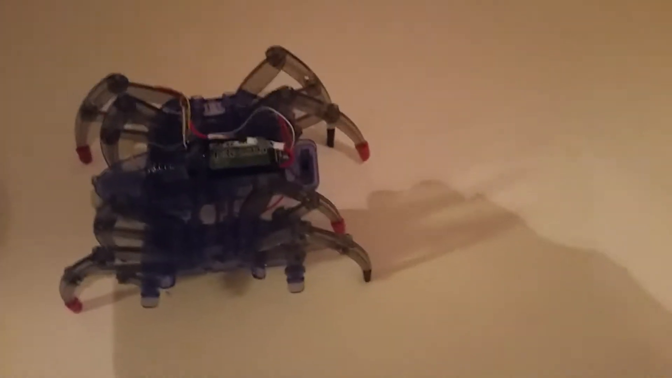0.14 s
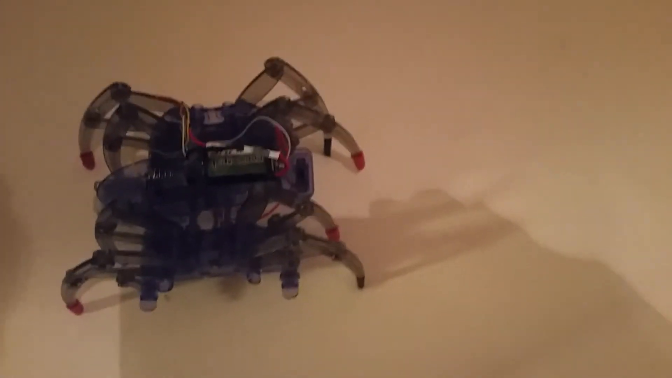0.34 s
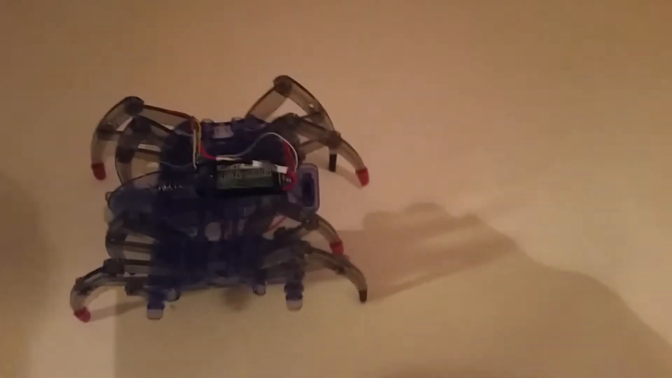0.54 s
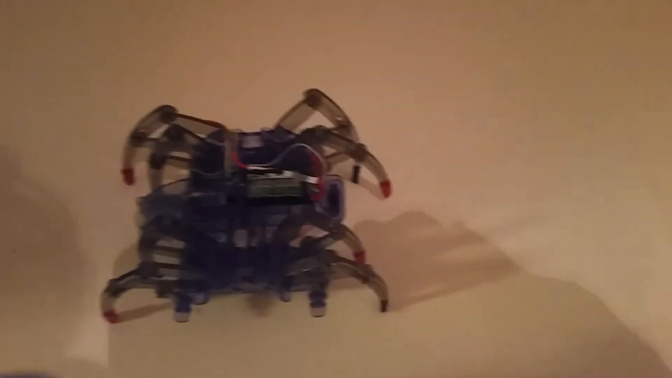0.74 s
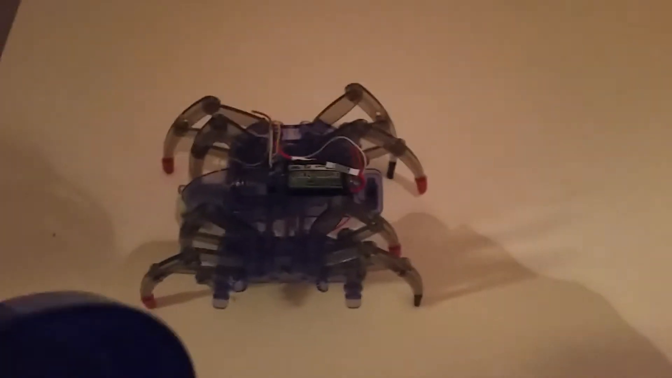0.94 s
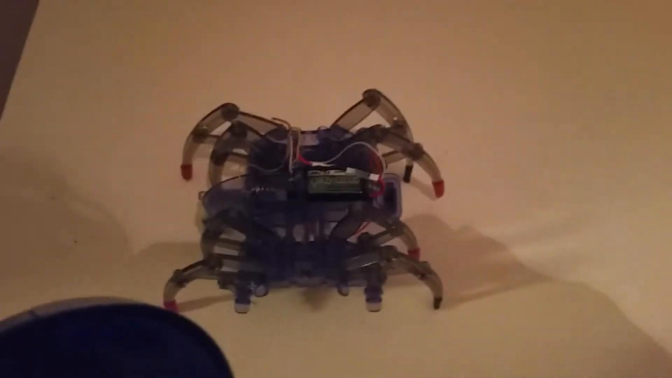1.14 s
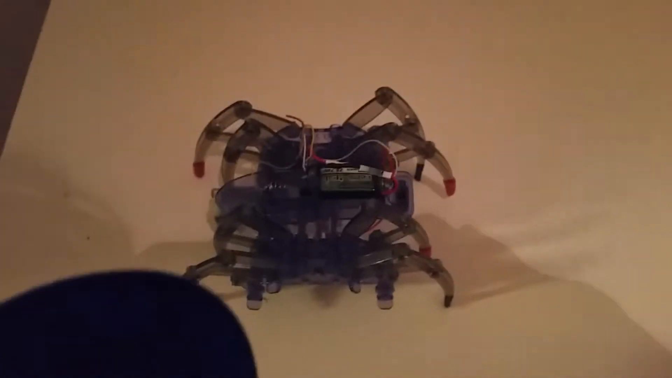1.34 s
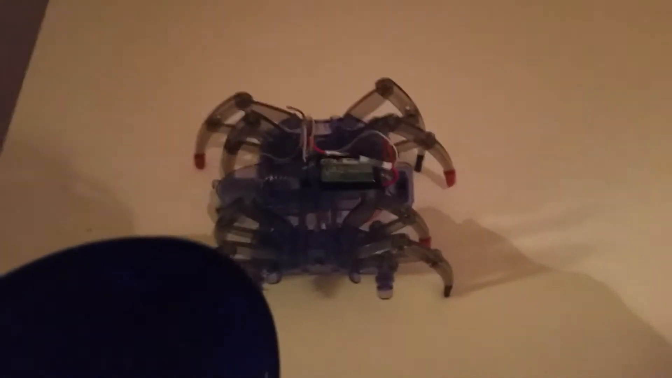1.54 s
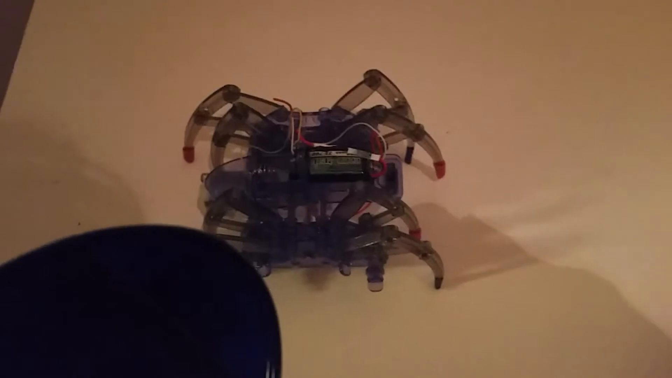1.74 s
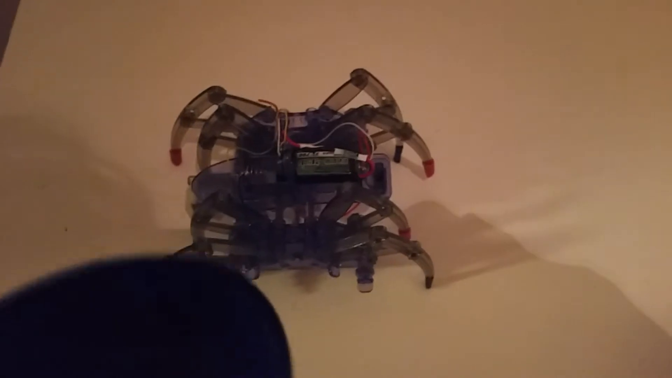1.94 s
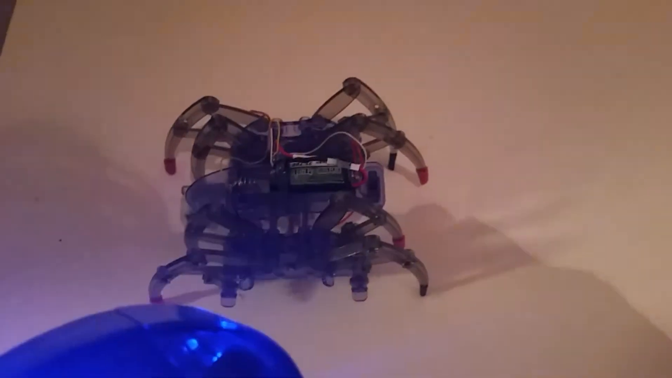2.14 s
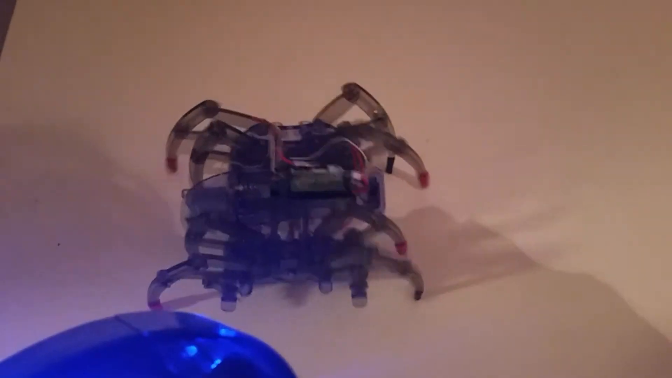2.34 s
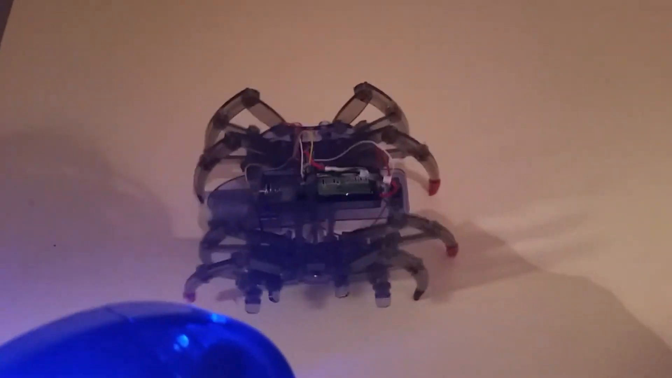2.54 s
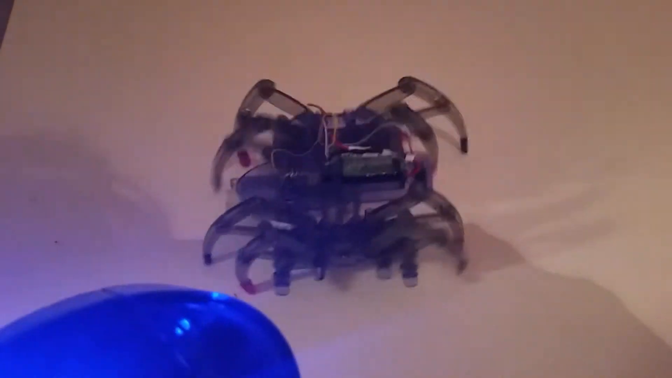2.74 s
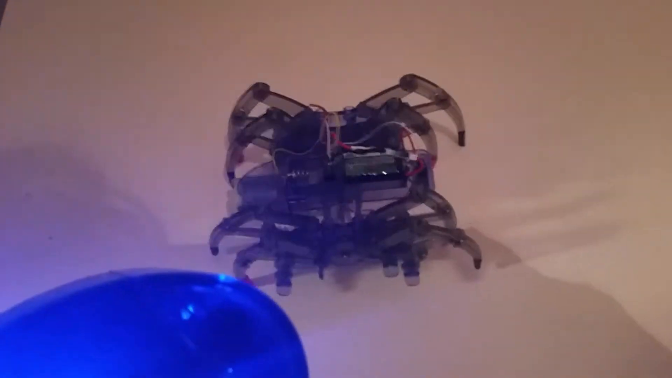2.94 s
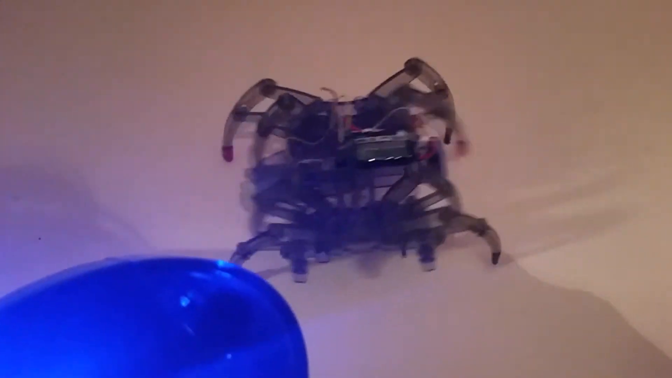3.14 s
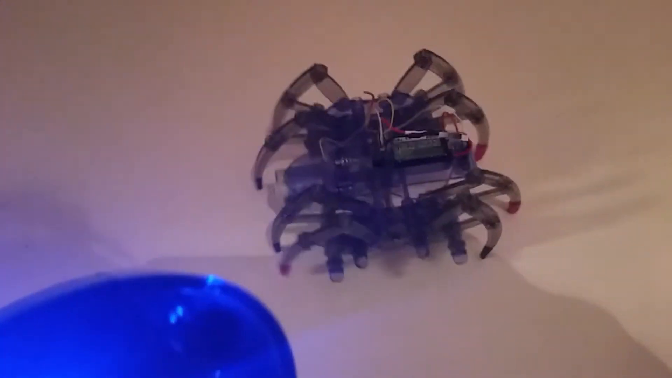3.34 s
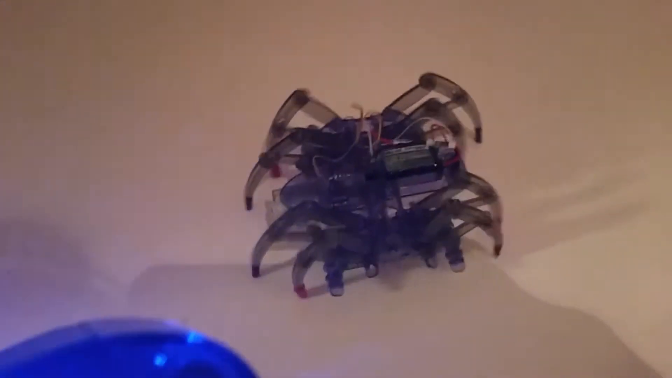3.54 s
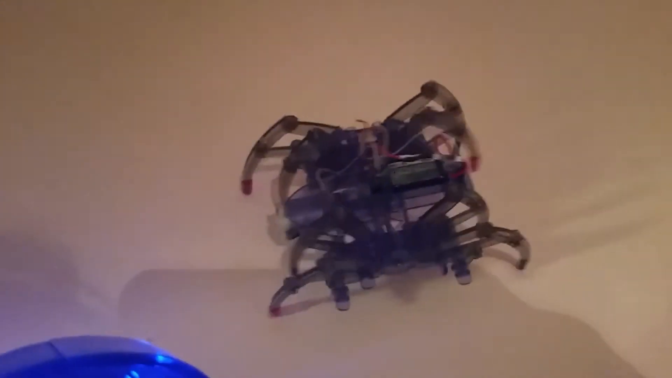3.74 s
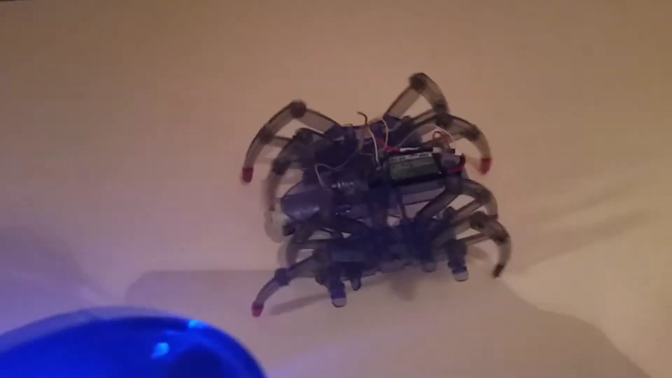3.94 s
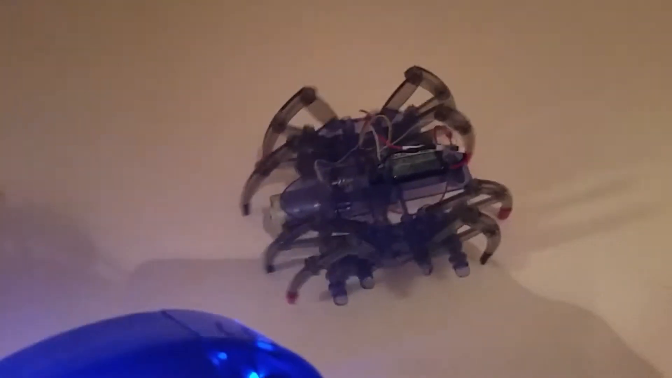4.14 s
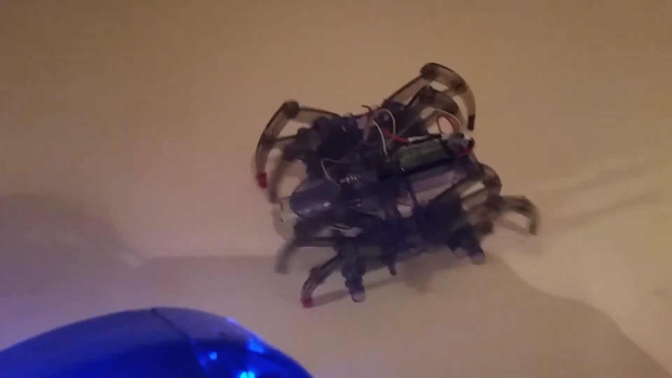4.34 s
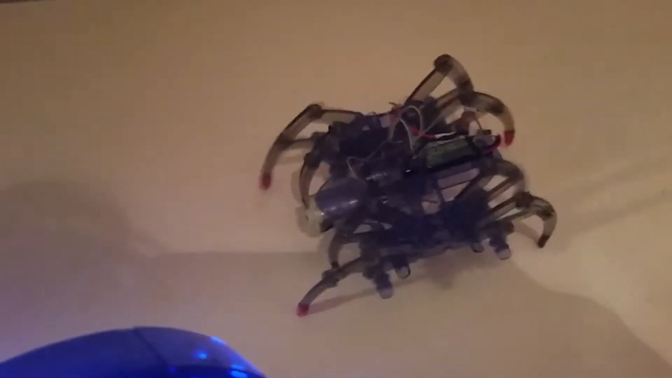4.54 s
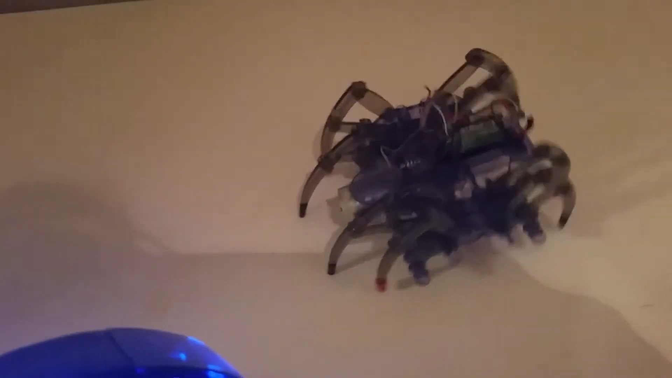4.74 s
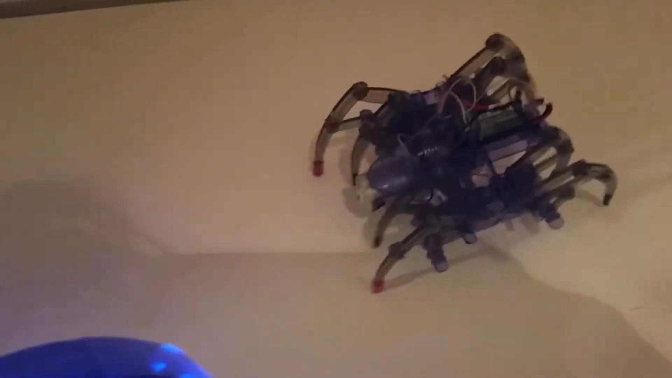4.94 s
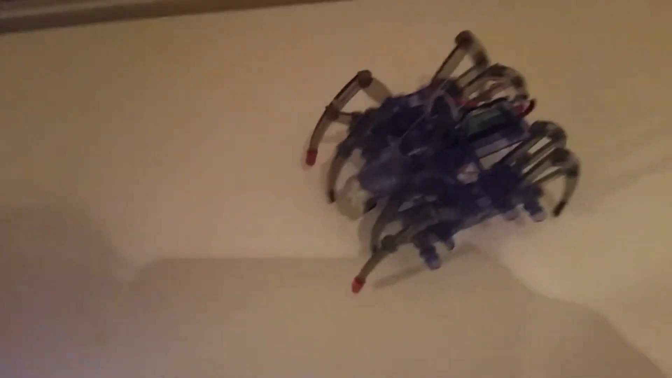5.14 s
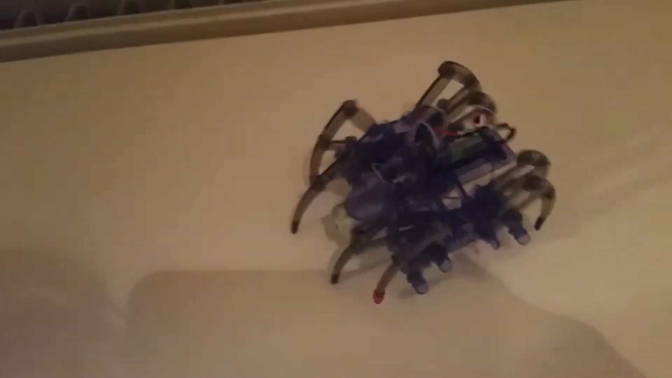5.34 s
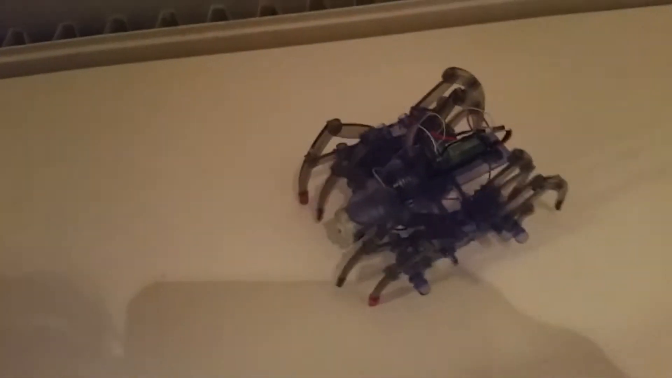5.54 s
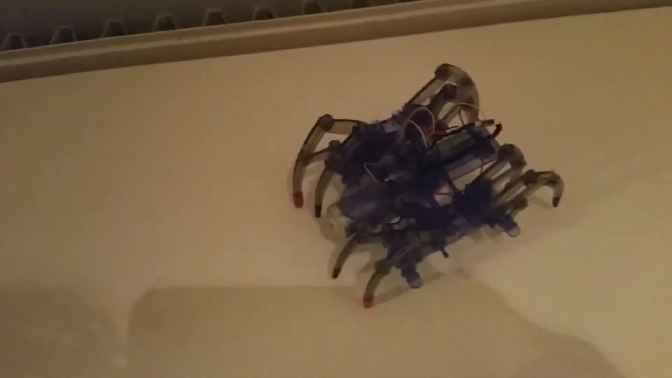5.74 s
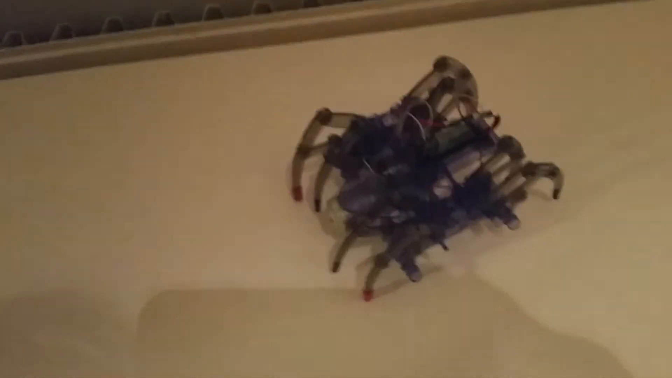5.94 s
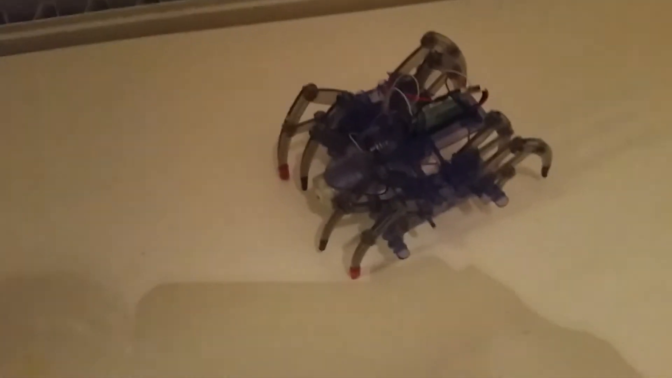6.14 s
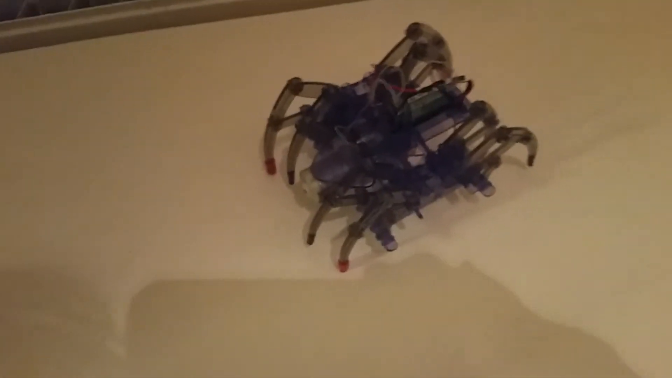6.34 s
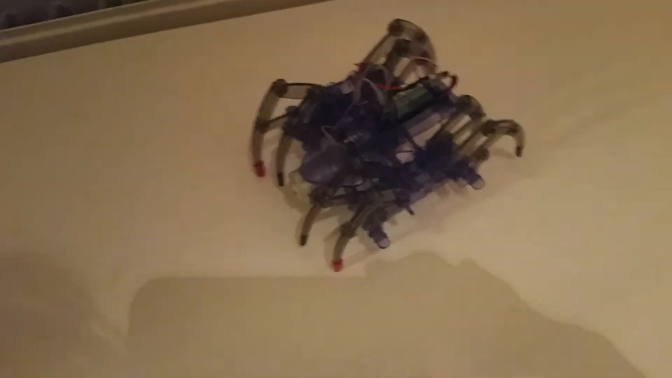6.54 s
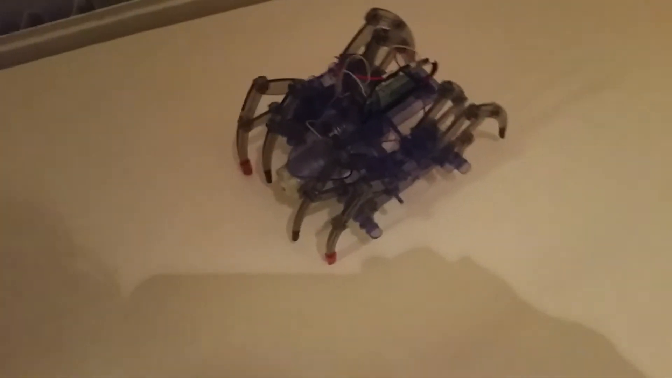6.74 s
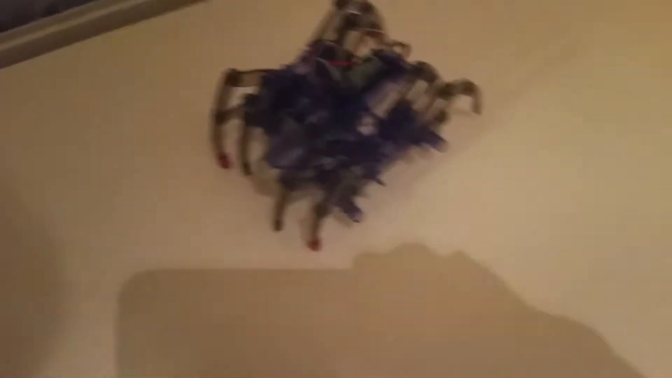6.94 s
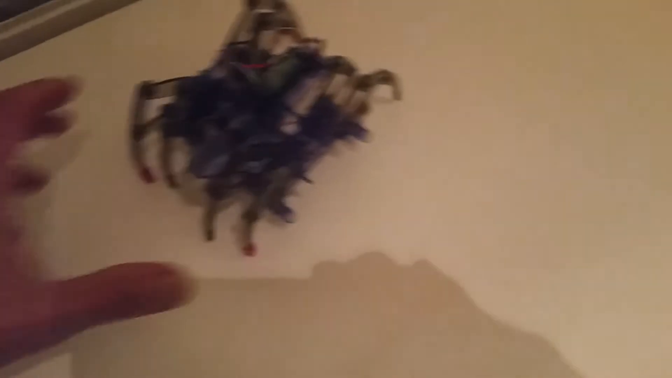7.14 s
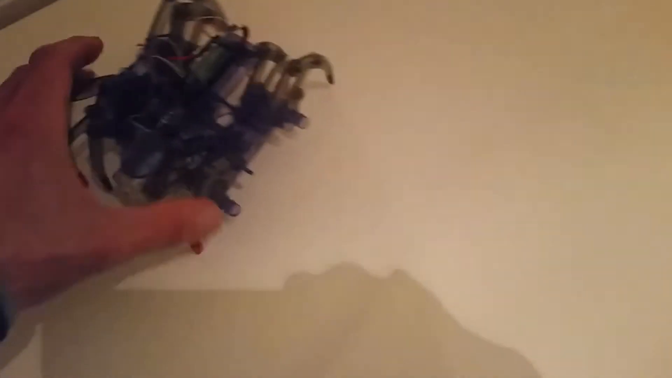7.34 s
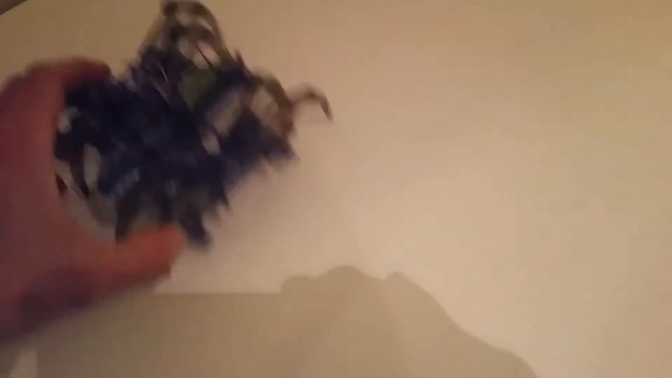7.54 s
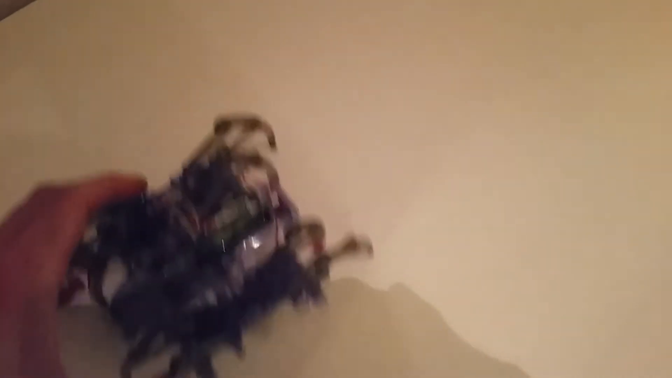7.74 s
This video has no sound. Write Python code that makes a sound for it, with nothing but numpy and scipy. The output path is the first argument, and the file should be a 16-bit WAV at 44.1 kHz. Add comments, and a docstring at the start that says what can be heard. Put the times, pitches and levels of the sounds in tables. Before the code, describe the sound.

A small geared motor whirs and rattles in quick surges as a plastic toy spider walks, with light clicks before and after.

```python
"""A walking toy on a hard floor

A small geared motor walks a plastic toy along, close to a hand-held camera in a quiet room.
The motor speeds up and coasts down in turns; each gear tooth knocks a puff of noise into the housing.
Plastic parts click, skin rustles on plastic and fingers bump the camera.
A faint hum, a rumble from the grip and microphone hiss lie under it all."""
import sys
import numpy as np
from scipy import signal
from scipy.fft import rfft, irfft, next_fast_len
from scipy.io import wavfile
from scipy.ndimage import uniform_filter1d

SR = 44100
rng = np.random.default_rng(int(sys.argv[2]) if len(sys.argv) > 2 else 0)


def unload_audio(sound):
    """Save the sound as a 16-bit wav file, at the path given as the first command line argument."""
    columns = np.transpose(np.atleast_2d(sound))
    # keep every value between -1 and 1, then stretch to whole-number steps
    steps = np.round(np.clip(columns, -1, 1) * 32767)
    wavfile.write(sys.argv[1], SR, steps.astype(np.int16))


N = 343803

# Bursts of power. Each row: on and off in seconds, speed the motor heads for in teeth per second.
POWER_BURSTS = [(2.29, 2.42, 1210), (2.53, 2.74, 1250), (2.965, 3.27, 1220), (3.43, 3.55, 1250),
                (3.58, 3.745, 1070), (3.89, 4.02, 1075), (4.08, 4.385, 1000), (4.47, 4.7, 1150),
                (4.75, 4.85, 1110), (4.9, 5.03, 1200), (5.18, 5.3, 1190), (5.37, 5.49, 1210)]
# When the gears are heard. Each row: start and stop in seconds.
WALK_TIMES = [(2.335, 2.85), (3.0, 5.6)]
# A leg takes the load and the gears surge.
# Each row: start and hold in seconds, then the levels of whir, rattle and ring in dB.
STRIDE_SURGES = [(2.401, 0.065, -42, -52, -53), (2.578, 0.093, -38, -51.5, -48),
                 (2.763, 0.042, -36.5, -49, -45.5), (3.024, 0.1, -39.5, -55, -49.5),
                 (3.223, 0.044, -40.5, -64.5, -47.5), (3.344, 0.068, -42.5, -58.5, -50.5),
                 (3.46, 0.072, -40, -55.5, -48.5), (3.582, 0.13, -34.5, -49, -43.5),
                 (3.874, 0.016, -39, -50.5, -47.5), (3.944, 0.094, -36, -51.5, -45.5),
                 (4.145, 0.044, -36.5, -51.5, -44.5), (4.283, 0.097, -37.5, -54, -44),
                 (4.437, .04, -40.5, -77, -48.5), (4.561, 0.069, -38.5, -58.5, -44),
                 (4.667, 0.02, -37.5, -59, -44.5), (4.808, 0.048, -36, -55, -45),
                 (4.899, 0.036, -31.5, -52, -43), (5.067, 0.06, -35.5, -54.5, -47.5),
                 (5.2, 0.13, -36.5, -54.5, -47.5), (5.354, 0.037, -39.5, -61.5, -51),
                 (5.459, 0.081, -33.5, -51, -42.5)]
# The levels between strides: whir, rattle and ring in dB.
BETWEEN_STRIDES_DB = [-48., -56.5, -54.5]
# The tone of gear whir, housing rattle and frame ring. Each row: frequency in Hz, relative level in dB.
WHIR_TONE = [(5060, -50), (8600, -59.5), (9180, -20), (10100, -9), (11100, -7), (12000, -8), (12900, -10.5),
             (13600, -7), (14300, -15), (15000, -16), (15700, -16.5)]
RATTLE_TONE = [(710, -18), (1200, -18.5), (1430, -6.5), (1800, 6.5), (1990, 3.5), (2140, 3), (2450, -5),
               (3200, 3.5), (4160, -29.5), (7040, -120)]
RING_TONE = [(1650, -13.5), (2800, -7), (3350, -8.5), (3630, -3), (3900, -6), (4610, -1), (5440, -14.5),
             (5970, -14.5), (6650, -8.5), (7370, -5), (8320, -12.5), (9000, -13.5), (11700, -29),
             (19800, -120)]
# A peak in the whir slides as the toy turns. Each row: time in seconds, frequency in Hz.
WHIR_PEAK = [(2.3, 12500), (3.05, 12800), (3.6, 12800), (4.1, 12100), (4.55, 13000), (5.3, 12850),
             (5.5, 13300)]
# The toy walks on the right. Each row: time in seconds, pan in dB (pan is left level minus right).
TOY_PAN = [(2.3, -9.5), (3.2, -10.5), (4.2, -9.5), (5.2, -11), (5.7, -8.5)]
# Parts of the motor's tone lean to one side. Each row: frequency in Hz, extra pan in dB.
MOTOR_TONE_PAN = [(1200, 13), (1800, 1), (2740, 11.5), (4200, 2), (5500, -2.5), (6400, -7), (8500, 3.5),
                  (9800, 12.5), (13000, 0.5), (15500, 9)]
# Squeals of the housing. Each row: start and length in seconds, pitch in Hz, level in dB.
PANEL_SQUEALS = [(2.61, 0.092, 4740, -40.5), (2.74, 0.043, 1695, -47.5), (3.2, 0.13, 2050, -52),
                 (3.56, 0.096, 4170, -43), (3.95, 0.093, 4300, -49), (4.19, 0.19, 4460, -45),
                 (4.24, 0.18, 1804, -47.5), (4.54, 0.075, 4500, -47.5), (4.55, 0.076, 1890, -49.5),
                 (4.77, 0.11, 1829, -48), (4.81, 0.15, 4020, -47), (4.89, 0.057, 2140, -50),
                 (5.04, 0.078, 4120, -51.5), (5.06, 0.12, 1800, -58), (5.24, 0.14, 4350, -52),
                 (5.45, 0.11, 2525, -46.5), (5.46, 0.081, 4300, -41.5), (5.46, 0.069, 3420, -47.5),
                 (5.5, 0.035, 2090, -47.5)]
# Plastic clicks, and at 2.985 s a sharp knock of the gear teeth that rings the same notes. Each row: start in
# seconds, peak of the high notes in dB, how far the middle and the low notes lie above that in dB, pan in dB.
PLASTIC_CLICKS = [(0.2267, -41, -0.5, -5, -13), (0.244, -44, -7, -12, -9), (0.2905, -47, -4, -14, -10),
                  (0.4492, -20.5, -9, -20.5, -3.5), (0.4613, -35, -10, -23, -8),
                  (2.1447, -39.5, 15, 7.5, -8), (2.7623, -25, -18, -25, 6), (2.985, -32, -10, -17, -9),
                  (3.213, -35, -8, -1, -8), (3.5375, -25, -15, -17, -8), (4.54, -31, -7.5, -6, -7),
                  (4.6645, -23, -10, -28, -7.5), (5.053, -31.5, -9.5, -3.5, -6.5),
                  (5.431, -6.5, -20.5, -22, -15), (5.6899, -46, -4, -2, 6), (6.239, -33.5, 1, -13, -23),
                  (6.245, -41, -4.5, 2.5, -6), (6.2522, -44, -3, 3, 1), (6.2582, -51, -3, -4, -5),
                  (6.2653, -37.5, -1.5, -2.5, -14), (6.272, -47, -3, -3.5, -9), (6.278, -47, -3, -1, -6),
                  (6.287, -45, -1, -3, -6), (6.3822, -36, -4, -19, -3), (6.3873, -27.5, -17, -18, -13),
                  (6.3957, -33, -7, -14, 0), (6.649, -49, -4, -12, 0), (7.6903, -49, -1, -10, -7)]
# The notes the plastic rings at, in a low, a middle and a high group.
# Each row: pitch in Hz, relative level in dB, seconds to fade by 60 dB.
PLASTIC_NOTES = [
    [(1100, 0, .016), (1600, -6, .01), (2300, -4, .012)],
    [(3300, -7, .01), (3900, 0, .012), (4500, -7, .008)],
    [(5800, -17, .005), (6900, -14, .006), (7900, -18, .005), (10400, -7, .007), (11800, 0, .008),
     (12900, -4, .007), (14000, -3, .007), (15300, -6, .006)],
]
# Fingers bump the camera. Each row: start in seconds, level in dB, pitch the knock sags to in Hz,
# pan of the knock in dB, level of the thud compared with the knock in dB.
FINGER_BUMPS = [(0.359, -35.5, 194, 6, -28), (0.667, -39.5, 91.5, -9, -5), (0.73, -25, 148, -4, -5),
                (0.755, -36, 99.6, 1, -8), (1.098, -37.5, 148, 6, -17), (1.152, -32, 156, 8.5, -3),
                (1.216, -41, 150, -5, -19), (1.436, -41, 114, -5, -9), (1.449, -30.5, 190, 0, -20),
                (1.455, -24.5, 198, 14, -14), (1.463, -29, 86, -7, -2), (1.589, -37.5, 91.5, -10, -15),
                (2.71, -38.5, 307, -1, -8), (2.819, -36, 96.9, -3, -3), (3.181, -33.5, 97, -6, -5),
                (3.222, -32.5, 144, 0, -4), (3.244, -34.5, 140, 4, -3), (3.282, -37, 75.4, -9, -6),
                (3.527, -38, 192, 0, -7), (3.715, -38.5, 245, 9, -13), (3.929, -40.5, 72.7, -5, 3),
                (3.992, -31.5, 84, -8, -17), (4.24, -36.5, 135, -2, -6), (4.442, -34.5, 79.5, -7, -2),
                (5.054, -35, 214, 1, -12), (5.145, -32, 79, -2, -1), (5.742, -32, 86.1, -5, 5),
                (5.909, -33, 146, 9, -18), (6.122, -37.5, 93, 11, -13), (6.239, -33.5, 78.1, 0, -14),
                (6.374, -32.5, 162, 3, 0.5), (6.389, -38, 80.7, -7, -6), (6.829, -36, 86.1, -4, -6),
                (6.879, -37.5, 148, 5, -3), (6.971, -42, 80, 3, -9), (7.2, -41, 89, -6, -12),
                (7.387, -37.5, 132, -6.5, -9)]
# Skin rustles. Each row: time of the peak in seconds, level in dB, rise and fall in dB per second.
SKIN_RUSTLES = [(0.07, -74, 300, 900), (0.19, -65.5, 250, 60), (0.27, -58.5, 300, 90),
                (0.455, -46, 350, 260), (6.2, -62, 1200, 60), (6.255, -60, 300, 80), (6.4, -51.5, 250, 220),
                (6.527, -62, 1000, 247.5), (6.651, -65, 507, 400), (6.965, -74.5, 152.5, 123),
                (7.7, -63.5, 90, 90)]
# The tone of a rustle. Each row: frequency in Hz, relative level in dB.
RUSTLE_TONE = [(3500, -67), (5200, -30), (6500, -17.5), (8000, -24.5), (9200, -27), (10100, -6),
               (11100, 4.5), (13500, 1), (15700, 0)]
# The tone of the hiss and of its airy treble. Each row: frequency in Hz, relative level in dB.
HISS_TONE = [(12, -43.5), (20, -12.5), (117, -7), (145, 1.5), (171, -7.5), (202, -1), (227, -15),
             (301, -2.5), (323, -9), (933, -14.5), (1360, -23), (2340, -28.5), (3000, -23.5), (3500, -14.5),
             (3900, -22), (4400, -24.5), (5000, -34), (5500, -49), (7000, -78)]
AIR_TONE = [(3180, -41), (5400, -34), (6510, -20.5), (8220, -26), (9910, -18), (13400, -2), (14500, 0),
            (15700, -1)]
# Which way the hiss leans. Each row: frequency in Hz, pan in dB.
HISS_PAN = [(60, -15.5), (120, 5), (240, -3), (480, 10), (950, 11), (1890, 8), (3770, 20), (7520, -19),
            (15000, 46.5)]
# How alike the two sides hiss. Each row: frequency in Hz, likeness (0 or less is unrelated, 1 the same).
HISS_LIKENESS = [(60, -1), (150, 1), (380, 0.4), (950, -0.1), (2380, -0.2), (5980, 0), (15000, -2.5)]
# The rumble of the grip comes and goes. Each row: time in seconds, level in dB.
RUMBLE_LEVEL = [(0, -59.5), (1.25, -56.5), (1.63, -53), (2.13, -71), (2.6, -62), (3.3, -61), (3.9, -49.5),
                (5.2, -53), (5.85, -58.5), (6.9, -52), (7.15, -61), (7.8, -56)]
# The tone of the rumble. Each row: frequency in Hz, relative level in dB.
RUMBLE_TONE = [(15, -35), (50, -3), (90, 3), (170, -13), (350, -23), (900, -72)]
# How alike the two sides rumble. Each row: frequency in Hz, likeness from 0 to 1.
RUMBLE_LIKENESS = [(30, .36), (80, .74), (150, .82)]
# The notes of the hum. Each row: pitch in Hz, level in dB.
HUM_NOTES = [(100, -65), (146, -61), (200, -57.5), (300, -65.5)]
# The room's echo. Each row: frequency in Hz, seconds to fade by 60 dB.
ROOM_FADE = [(500, .6), (2000, .5), (6000, .5), (9000, .45), (13000, .24)]

SPIN_UP_S, COAST_TEETH_PER_S2, CREEP_TEETH_PER_S = .15, 5000., 30.
START_DB_PER_S, STOP_DB_PER_S = 898, 255
LOAD_DB_PER_S, UNLOAD_DB_PER_S = 228, 191
CLICK_RISE_S, DETUNE = .0008, .035  # a click may shift each note by up to this share
BUMP_CYCLES, THUD_HZ, THUD_PEAK_S = .95, 60., .009
SHELL_HZ, SHELL_DB, SHELL_FADE_S, SHELL_RISE_S = 432, -10.5, .032, .0028
LINGER_DB, LINGER_DB_PER_S = -23.5, 31  # a faint tail after each rustle
HISS_DB, AIR_DB, ECHO_DB = -51.5, -72, -14.
WAVER_DB, WAVER_HZ = 1.8, 3.  # the hum wavers
TREBLE_LIMIT_HZ = 15700


def motor():
    """Each gear tooth strikes a puff of noise over a steady grind; housing and frame shape its tone."""
    teeth_passed = np.cumsum(gear_speed() * (1 + .01 * wander(hz=60.))) / SR
    tooth = teeth_passed.astype(int)
    since_tooth_s = (np.arange(N) - np.searchsorted(tooth, tooth)) / SR
    tooth_db = 1.7 * rng.standard_normal(4000)[tooth]  # no two teeth hit equally hard
    puffs = gain_of(tooth_db - 60 * since_tooth_s / .004) * np.minimum(since_tooth_s / .0002, 1)
    wobble = gain_of(1.25 * wander(hz=30.))  # the gears run out of true
    out = np.zeros((2, N))
    layers = [(WHIR_TONE, .16, .45), (RATTLE_TONE, .4, .7), (RING_TONE, .22, .5)]
    for (tone, grind, likeness), gain in zip(layers, leg_load()):
        tooth_noise = stereo_pair(likeness, *rng.standard_normal((2, N))) * (puffs + grind) * wobble
        layer = colour(tooth_noise,
                       lambda hz: at_hz(tone, hz) + np.outer([.5, -.5], at_hz(MOTOR_TONE_PAN, hz)))
        if tone is WHIR_TONE:
            layer += 1.7 * resonate(layer, over_time(WHIR_PEAK), width_hz=1300.) * [[.3], [1]]
        out += layer / np.std(layer.mean(0)) * gain
    return patchy(out, depth_db=2.5) * sides(over_time(TOY_PAN)) + panel_squeals(tooth_noise[1])


def gear_speed():
    """Teeth per second: power eases the motor up to speed, and friction slows it when the power is off."""
    t = np.arange(N) / SR
    speed = np.full(N, CREEP_TEETH_PER_S)
    for on, off, goal in POWER_BURSTS:
        powered_s = np.clip(t, on, off) - on
        driven = goal - (goal - speed[round(on * SR)]) * np.exp(-powered_s / SPIN_UP_S)
        slowed = driven - COAST_TEETH_PER_S2 * np.maximum(t - off, 0)
        speed = np.where(t >= on, np.maximum(slowed, CREEP_TEETH_PER_S), speed)
    return speed


def leg_load():
    """How loud whir, rattle and ring are while the toy walks: a steady level plus a surge each stride."""
    surges = np.array([gain_of(swell_db(start, start + hold, LOAD_DB_PER_S, UNLOAD_DB_PER_S))
                       for start, hold, *_ in STRIDE_SURGES])
    surge_gains = gain_of(np.array(STRIDE_SURGES)[:, 2:].T)
    power = gain_of(BETWEEN_STRIDES_DB)[:, None] ** 2 + surge_gains ** 2 @ surges ** 2
    walking = sum(gain_of(swell_db(*walk, START_DB_PER_S, STOP_DB_PER_S)) for walk in WALK_TIMES)
    return np.sqrt(power) * walking


def panel_squeals(tooth_noise):
    """A loaded leg lets one panel of the housing sing for a moment, shaken by the gear teeth."""
    out = np.zeros(N)
    for start, length, hz, db in PANEL_SQUEALS:
        span = slice(round(start * SR), round((start + length) * SR))
        pitch_hz, width_hz = np.full(span.stop - span.start, hz), .07 * hz
        ring = resonate(resonate(tooth_noise[span], pitch_hz, width_hz), pitch_hz, width_hz)
        out[span] += gain_of(db) * evened(ring) * signal.windows.tukey(len(ring), .3)
    return out * [[.7], [1.3]]  # louder on the right


def plastic_clicks():
    """Each click sets the plastic ringing briefly, at slightly different pitches every time."""
    t, out = np.arange(1500) / SR, np.zeros((2, N + 1500))
    rise = np.minimum(t / CLICK_RISE_S, 1) ** 2
    chances = rng.uniform(-.86, 1, (len(PLASTIC_CLICKS), 3, 8, 3))
    for (start, peak_db, middle_db, low_db, pan_db), chance in zip(PLASTIC_CLICKS, chances):
        at = round(start * SR)
        for notes, group_db, draws in zip(PLASTIC_NOTES, [low_db, middle_db, 0], chance):
            ring = np.zeros((2, len(t)))
            for (hz, db, fade_s), (shift, offset, left_lead) in zip(notes, draws):
                phase = 2 * np.pi * hz * (1 + DETUNE * shift) * t + np.pi * offset
                ring += gain_of(db - 60 * t / fade_s) * np.sin([phase + .71 * left_lead, phase])
            ring *= rise * sides(pan_db)[:, None]
            out[:, at:at + len(t)] += gain_of(peak_db + group_db) * ring / abs(ring.mean(0)).max()
    return out[:, :N]


def finger_bumps():
    """A knock sags in pitch and rings the camera's shell; a deep thud reaches each side differently."""
    t, out = np.arange(4000) / SR, np.zeros((2, N + 4000))
    shell = gain_of(SHELL_DB - 60 * t / SHELL_FADE_S) * np.sin(2 * np.pi * SHELL_HZ * t)
    shell *= np.minimum(t / SHELL_RISE_S, 1)
    thud_swell = (t / THUD_PEAK_S * np.exp(1 - t / THUD_PEAK_S)) ** 2
    thud_offsets = rng.uniform(0, .7, (len(FINGER_BUMPS), 2, 1))
    for (start, db, hz, pan_db, thud_db), offset in zip(FINGER_BUMPS, thud_offsets):
        cycles = t * hz
        sag = .5 * (1 - np.exp(-cycles / .19))  # an extra half cycle early on makes the pitch start high
        rise = np.sin(np.pi * np.minimum(cycles, .5)) ** 2
        knock = np.sin(2 * np.pi * (cycles + sag)) * np.exp(-cycles / BUMP_CYCLES) * rise
        knock = (knock / abs(knock).max() + shell) * sides(pan_db)[:, None]
        thud = np.sin(2 * np.pi * (THUD_HZ * t + offset)) * thud_swell * sides(-4.)[:, None]
        at = round(start * SR)
        out[:, at:at + len(t)] += gain_of(db) * (knock + gain_of(thud_db) * thud)
    return out[:, :N]


def skin_rustle():
    """Skin rubs on plastic: swells of grainy, high noise, louder on the right."""
    grains = rng.standard_normal((2, N)) * gain_of(1.6 * wander(hz=80.))
    noise = colour(grains, lambda hz: at_hz(RUSTLE_TONE, hz))
    power = np.zeros(N)
    for peak_s, db, rise, fall in SKIN_RUSTLES:
        power += gain_of(db + swell_db(peak_s, peak_s, rise, fall)) ** 2
        power += gain_of(db + LINGER_DB + swell_db(peak_s, peak_s, rise, LINGER_DB_PER_S)) ** 2
    return noise / np.std(noise.mean(0)) * np.sqrt(power) * sides(-3.5)[:, None]


def room_echo(x):
    """Many small reflections blur into a short echo whose treble dies first."""
    echoes = np.zeros((2, SR))
    at = np.arange(300, SR - 20, 20) + rng.integers(0, 20, (2, (SR - 301) // 20))
    np.put_along_axis(echoes, at, rng.choice([-1., 1.], at.shape), 1)
    hz, t, bands = signal.stft(echoes, SR, nperseg=256)
    fade = gain_of(-60 * t / at_hz(ROOM_FADE, hz)[:, None])
    tail = signal.istft(bands * fade, SR, nperseg=256)[1]
    return signal.fftconvolve(x, tail / np.linalg.norm(tail[0]), axes=1)[:, :N]


def background():
    """Rumble, hum and hiss; the rumble and the hiss are shaped out of plain noise."""
    size = next_fast_len(N)
    hz = np.fft.rfftfreq(size, 1 / SR)
    spectra = rfft(rng.standard_normal((6, size)))
    return grip_rumble(spectra[2:4], hz, size) + hum() + microphone_hiss(spectra[:2], spectra[4:], hz, size)


def grip_rumble(noise_spectra, hz, size):
    """The hand holding the camera makes a low, lumpy rumble."""
    spectrum = stereo_pair(at_hz(RUMBLE_LIKENESS, hz), *noise_spectra) * gain_of(at_hz(RUMBLE_TONE, hz))
    lumps = gain_of(2.1 * wander(hz=19.))
    rumble = irfft(spectrum, size)[:, :N] * lumps * sides(-2.5)[:, None]
    return gain_of(over_time(RUMBLE_LEVEL)) * evened(rumble)


def hum():
    """A few faint, low notes waver in level and pitch."""
    t, out = np.arange(N) / SR, np.zeros(N)
    for hz, db in HUM_NOTES:
        level = np.sqrt(2) * gain_of(db + WAVER_DB * wander(WAVER_HZ))
        out += level * np.sin(2 * np.pi * (hz * t + rng.random()) + .51 * wander(hz=6.))
    return out


def microphone_hiss(hiss_spectra, air_spectra, hz, size):
    """The microphones add a soft, dull hiss with a fainter, airy treble on top."""
    spectrum = stereo_pair(at_hz(HISS_LIKENESS, hz), *hiss_spectra) * gain_of(at_hz(HISS_TONE, hz))
    hiss = irfft(spectrum * sides(at_hz(HISS_PAN, hz)), size)[:, :N]
    hiss = patchy(hiss, depth_db=1.) / np.std(hiss.mean(0))
    air = irfft(air_spectra * gain_of(at_hz(AIR_TONE, hz)), size)[:, :N] * sides(3.)[:, None]
    return gain_of(HISS_DB) * hiss + gain_of(AIR_DB) * air / np.std(air.mean(0))


def gain_of(db):
    """Turns decibels into a number to multiply by."""
    return 10 ** (np.asarray(db) / 20)


def evened(x):
    """Scales a signal to an average (rms) level of one."""
    return x / np.sqrt(np.mean(x ** 2) + 1e-20)


def at_hz(rows, hz):
    """Looks up a table by frequency, with the octaves evenly spaced."""
    row_hz, values = np.transpose(rows)
    return np.interp(np.log(hz + 1), np.log(row_hz + 1), values)


def over_time(rows):
    """Joins points in time with straight lines."""
    return np.interp(np.arange(N) / SR, *np.transpose(rows))


def swell_db(start, stop, rise, fall):
    """Zero dB from start to stop, rising before and falling after at so many dB a second."""
    t = np.arange(N) / SR
    return -rise * np.maximum(start - t, 0) - fall * np.maximum(t - stop, 0)


def wander(hz):
    """A random drift of average size one, moving up to about hz times a second."""
    return evened(signal.lfilter(*signal.butter(2, hz, fs=SR), rng.standard_normal(N)))


def sides(pan_db):
    """Left and right gains; a pan above zero leans left."""
    return gain_of(np.array([pan_db / 2, -pan_db / 2]))


def stereo_pair(likeness, right, other):
    """Mixes two noises into a left and a right side that are partly alike."""
    likeness = np.clip(likeness, 0, 1)
    return np.array([likeness * right + np.sqrt(1 - likeness ** 2) * other, right])


def colour(x, shape_db):
    """Shapes the tone by shape_db(Hz), with a filter that rings only after a sound arrives."""
    hz = abs(np.fft.fftfreq(4096, 1 / SR))
    log_gain = np.log(np.maximum(gain_of(shape_db(hz)), 1e-5))
    response = np.fft.ifft(np.exp(np.conj(signal.hilbert(log_gain)))).real[..., :2048]
    return signal.oaconvolve(x, np.atleast_2d(response), axes=1)[:, :N]


def resonate(x, hz, width_hz):
    """Picks out a band that follows the curve hz: shift it down to zero, smooth it, shift it back."""
    shift = np.exp(2j * np.pi * np.cumsum(hz) / SR)
    decay = np.exp(-np.pi * width_hz / SR)
    return 2 * (shift * signal.lfilter([1 - decay], [1, -decay], x / shift)).real


def patchy(x, depth_db):
    """The tone drifts in patches a few hundred hertz wide and about a tenth of a second long."""
    bands = signal.stft(x, nperseg=512)[2]
    patches = uniform_filter1d(rng.standard_normal(bands.shape[1:]), size=3, axis=0)
    for frames in (16, 8):
        patches = uniform_filter1d(patches, size=frames, axis=1)
    return signal.istft(bands * gain_of(depth_db * evened(patches)), nperseg=512)[1][:, :N]


def scene():
    """Motor, clicks and rustles echo in the room; bumps and background are added without echo."""
    near = motor() + plastic_clicks() + skin_rustle()
    near[1] = np.roll(near[1], 3)  # the right microphone sits a little further back
    return near + gain_of(ECHO_DB) * room_echo(near) + finger_bumps() + background()


def record(dry):
    """The microphones lose the deepest bass, and the highest treble is cut off."""
    thinned = signal.lfilter(*signal.butter(1, 35., "high", fs=SR), dry)
    treble_cut = signal.firwin(511, TREBLE_LIMIT_HZ, window=("kaiser", 9), fs=SR)
    return signal.oaconvolve(thinned, treble_cut[None], "same")


dry = scene()
out = record(dry)
unload_audio(out)
```